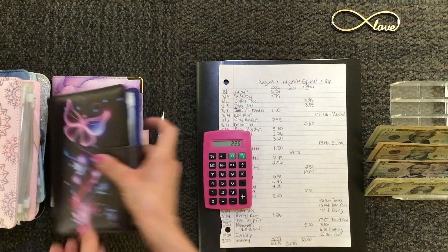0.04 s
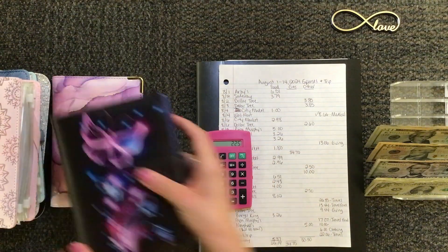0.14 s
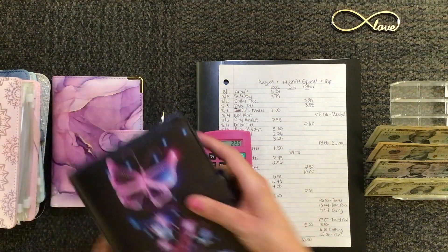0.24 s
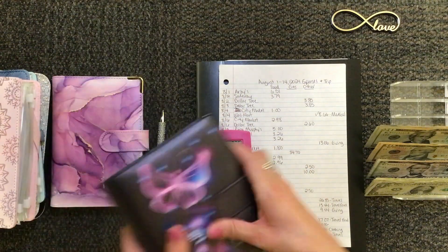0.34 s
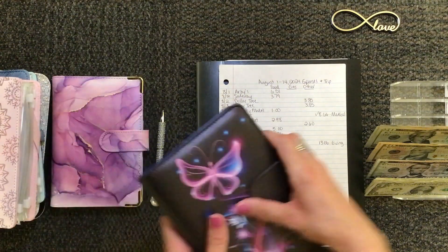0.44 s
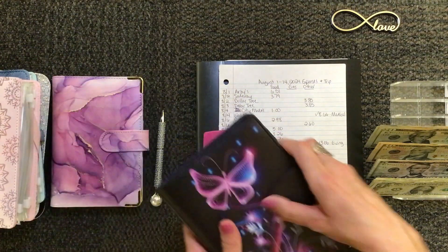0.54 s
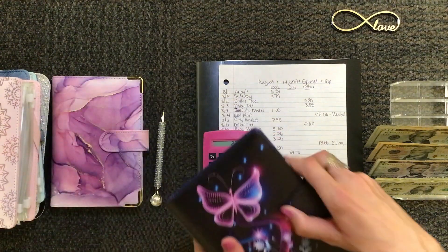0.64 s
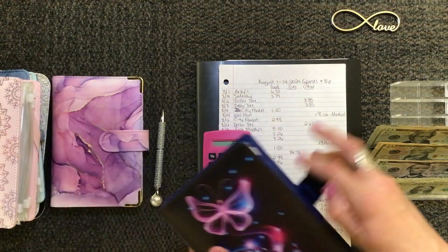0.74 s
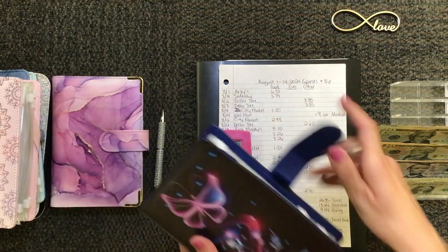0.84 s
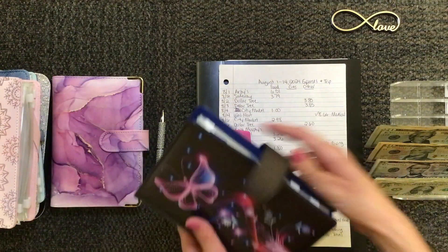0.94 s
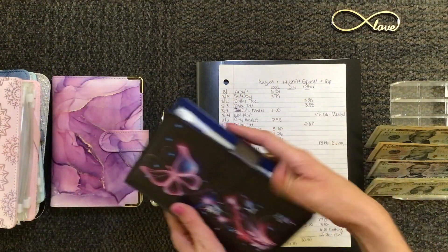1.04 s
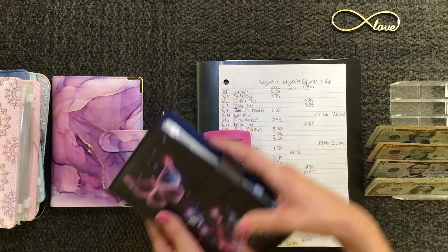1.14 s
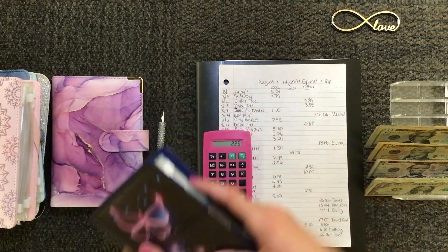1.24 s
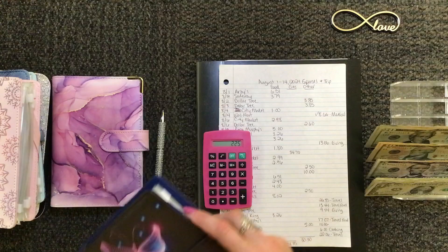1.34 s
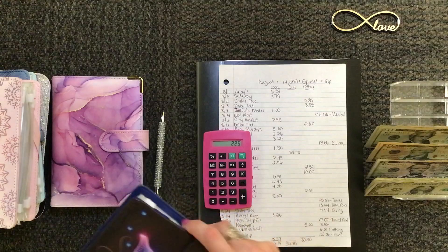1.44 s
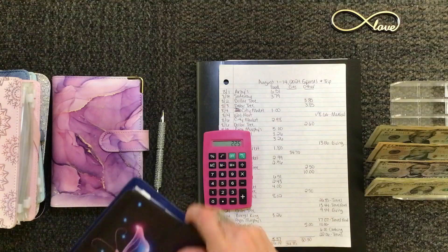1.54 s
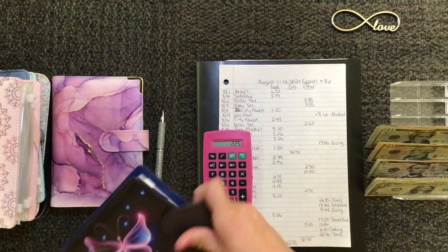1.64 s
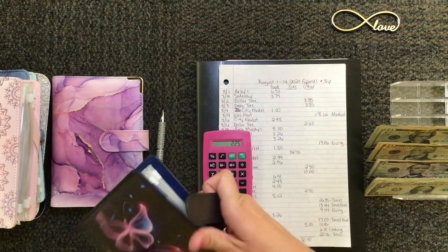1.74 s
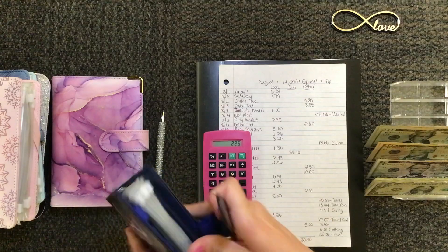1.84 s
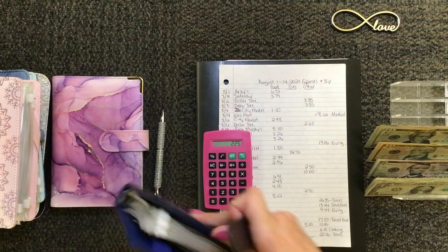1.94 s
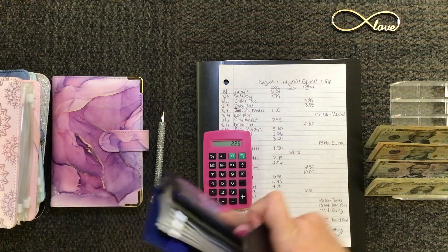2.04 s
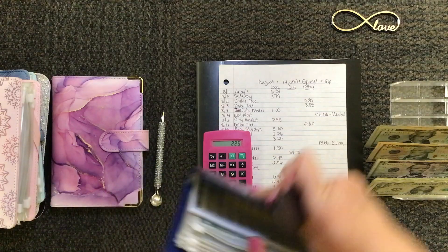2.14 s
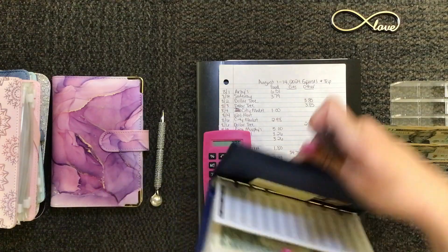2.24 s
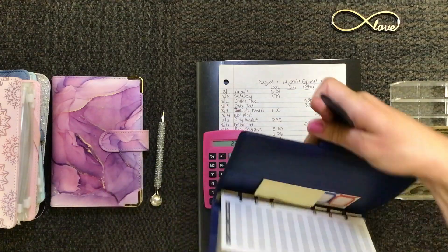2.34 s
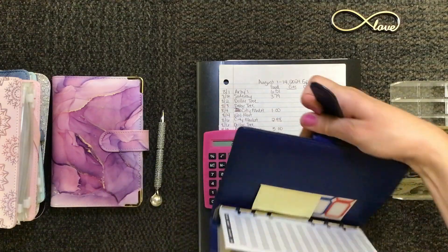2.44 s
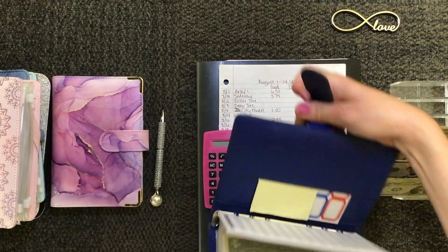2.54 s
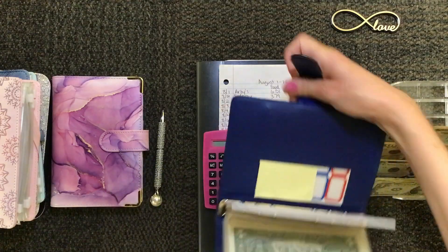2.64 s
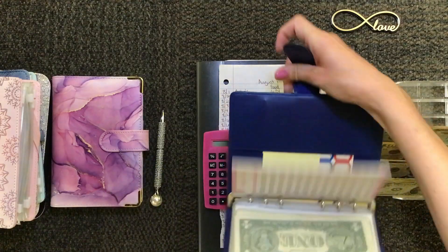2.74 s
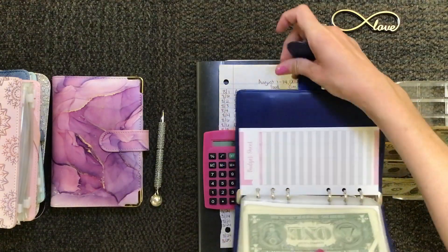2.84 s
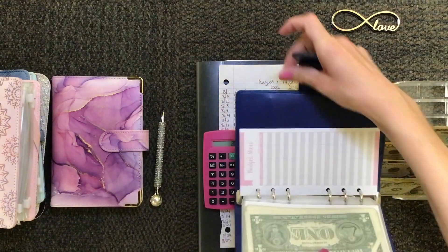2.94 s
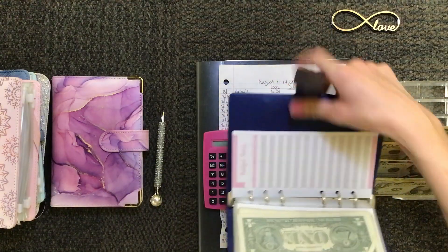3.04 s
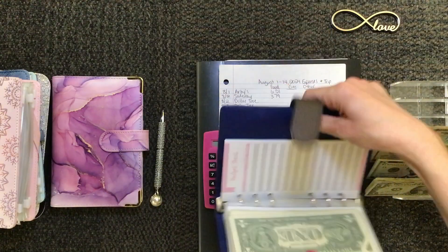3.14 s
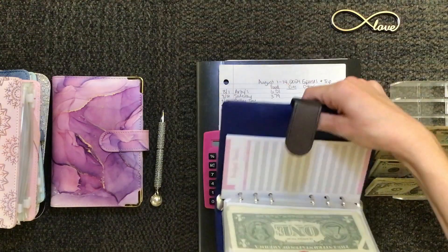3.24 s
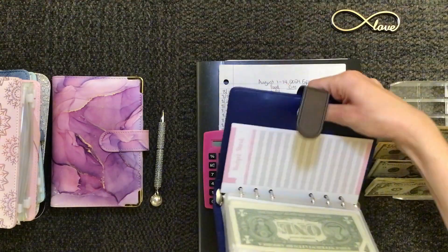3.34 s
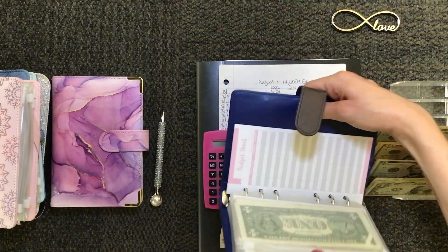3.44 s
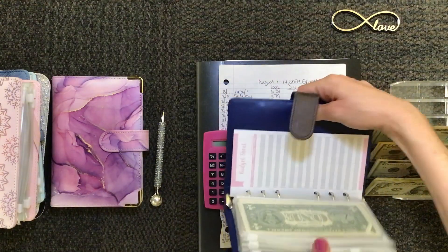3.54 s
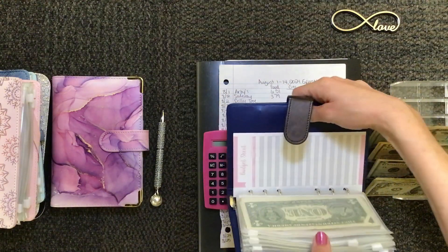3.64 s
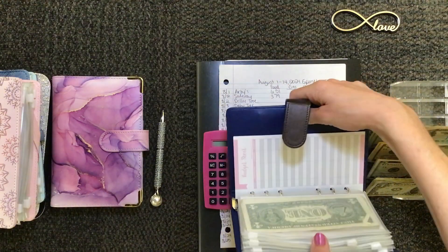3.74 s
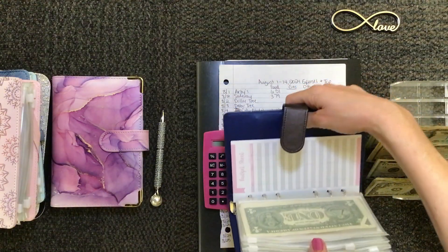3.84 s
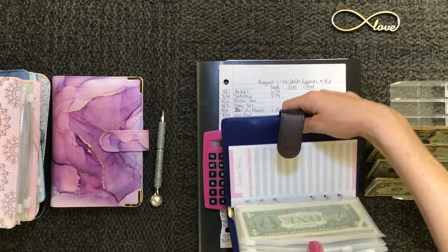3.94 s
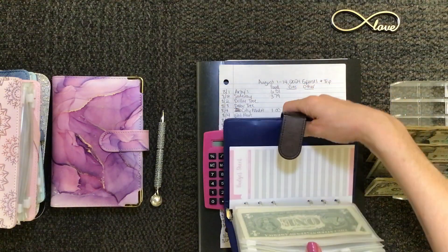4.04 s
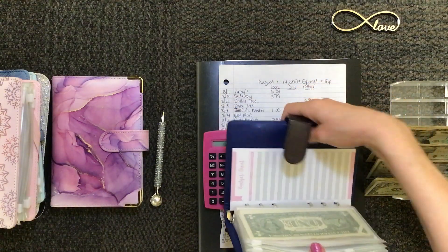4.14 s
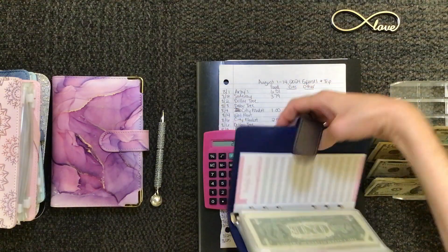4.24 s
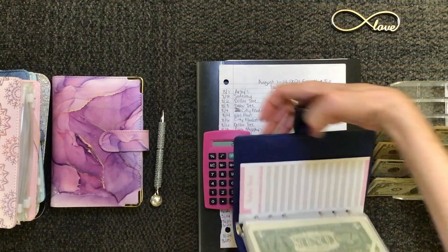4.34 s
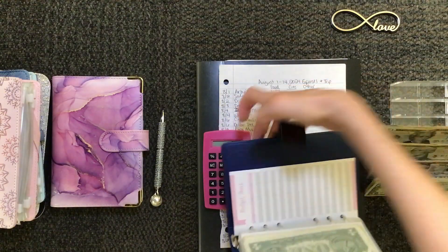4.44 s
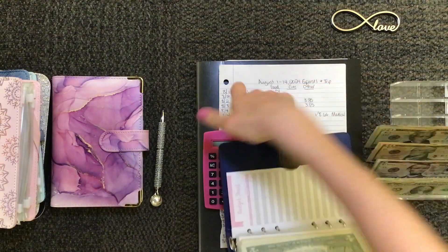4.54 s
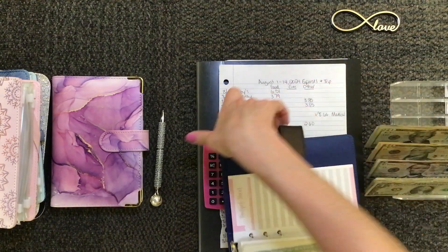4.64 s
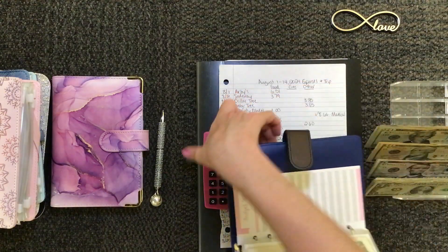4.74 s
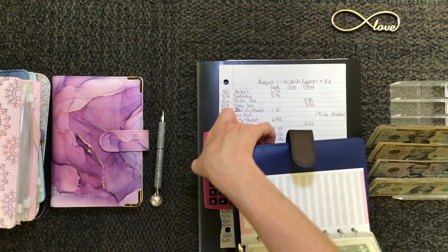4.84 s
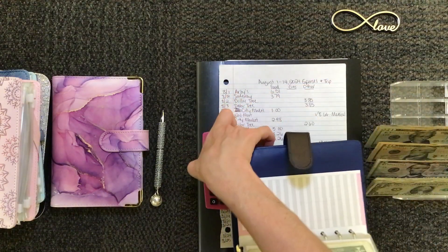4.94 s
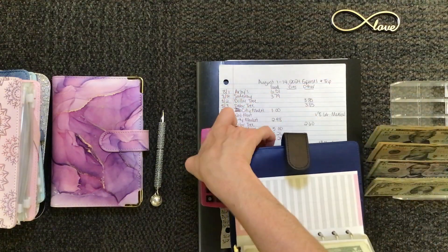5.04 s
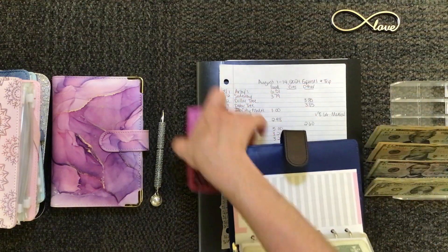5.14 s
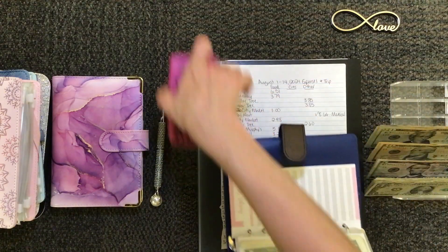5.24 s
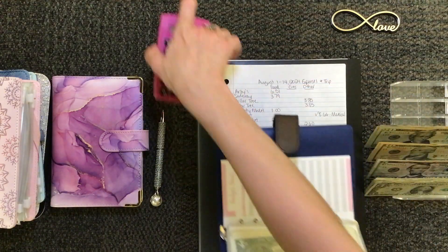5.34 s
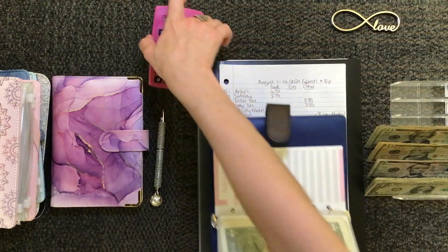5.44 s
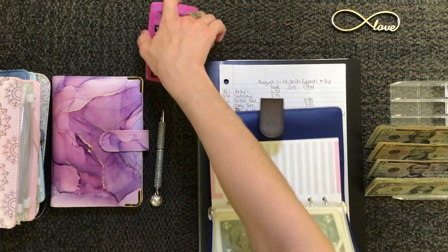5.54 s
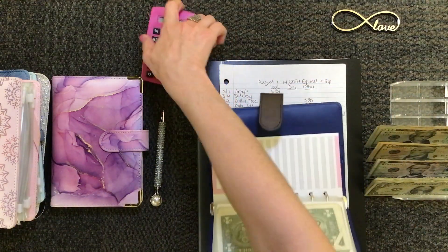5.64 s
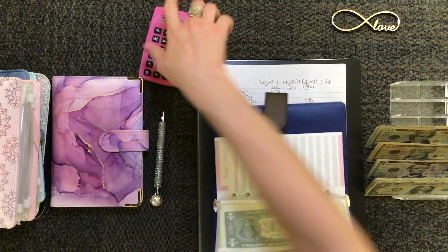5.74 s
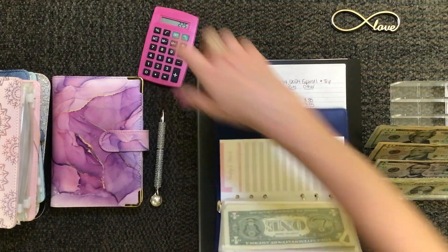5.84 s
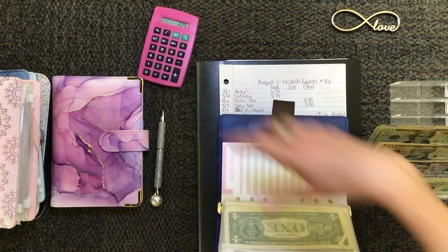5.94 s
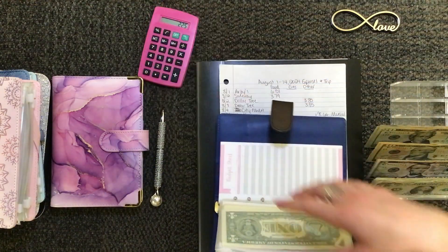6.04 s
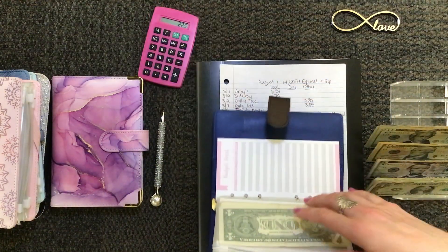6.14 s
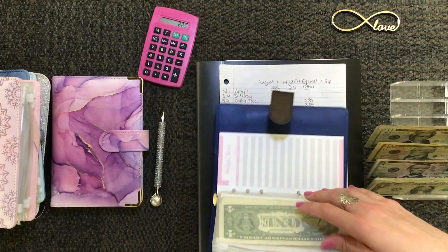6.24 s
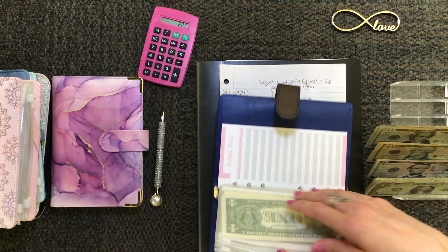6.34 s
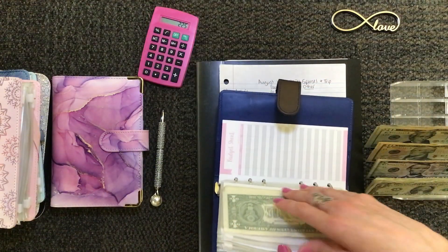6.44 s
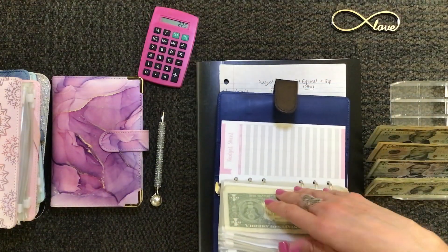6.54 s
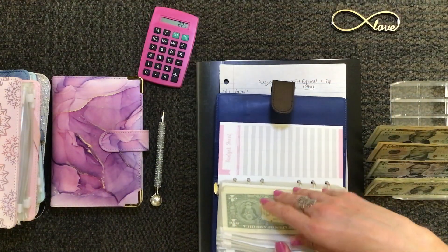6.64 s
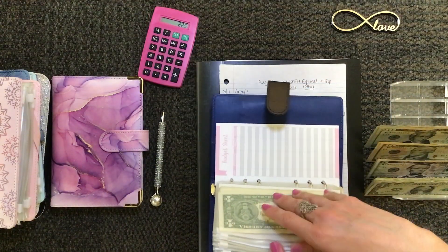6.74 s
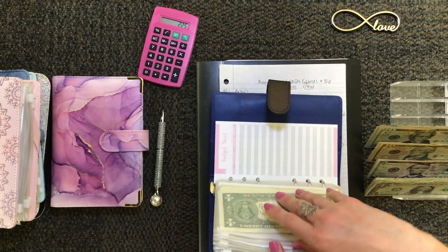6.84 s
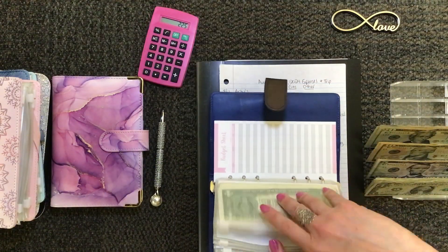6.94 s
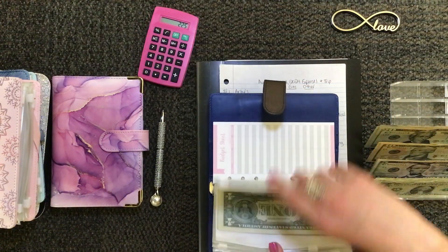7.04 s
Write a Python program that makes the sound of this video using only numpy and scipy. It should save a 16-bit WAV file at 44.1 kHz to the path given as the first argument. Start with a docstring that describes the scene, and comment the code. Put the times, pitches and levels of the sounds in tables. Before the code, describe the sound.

A small room's low rumble and faint hiss run throughout, with everything handled close to the microphone. A brief rub opens, then at 0.3 s a brisker slide with a soft, low bump, and more rubbing and dragging over cloth until 0.9. At 1.02 s a clasp pops extremely hard, with a bright crack and short boom. Uneven, airy rubs follow at 1.35, 1.55 and 1.8 s, then gentler sliding with faint crinkles from 2.1. At 2.85 s a second hard snap is slightly duller. Sleeves flex with small papery ticks until about 4.2, with soft rubs to 4.4. Hollow finger taps come around 4.5-4.7 and 5.3-5.4. From 5.64 to 5.81 s a plastic calculator is set down in a rapid, ringing clatter. After a pause, fingers brush and tick over plastic sleeves at 6.2-6.7, with a last flick near 7.1.

```python
"""Soft rubs over low room rumble come first, then a bump and the hard pop of a cash binder's clasp.
The binder is handled close to the microphone at a cloth-covered table in a small room: filtered noise
makes hands slide and cloth drag, damped resonances make the clasp and the cover snap as it knocks down.
A plastic calculator, a sum of ringing case modes, is set aside with a chatter of touches.
Fingers brush and tick over the plastic sleeves of banknotes: short resonant flips with crackle."""
import sys
import numpy as np
from scipy import signal
from scipy.fft import rfft, irfft, next_fast_len
from scipy.io import wavfile

SR = 44100
rng = np.random.default_rng(int(sys.argv[2]) if len(sys.argv) > 2 else 0)


def wav_out(sig):
    """Save sig, one row per channel (or a flat mono array), as 16-bit PCM at SR to the path in sys.argv[1]."""
    wavfile.write(sys.argv[1], SR, np.round(np.clip(np.atleast_2d(sig).T, -1, 1) * 32767).astype(np.int16))


N = 312669
TIME = np.arange(N) / SR
AGE = TIME[:SR // 2]  # time since a contact, up to half a second


def from_db(db):
    """Decibels to gain."""
    return 10 ** (np.asarray(db) / 20)


def rms_one(x):
    """Scale to unit power."""
    return x / np.sqrt(np.mean(x ** 2) + 1e-20)


def at_hz(points, hz):
    """Read a table along a log-frequency axis."""
    f, value = np.transpose(points)
    return np.interp(np.log(hz + 1e-9), np.log(f), value)


def tint(x, spectrum):
    """Give a noise its colour; unit power."""
    size = next_fast_len(len(x))
    gain = from_db(at_hz(spectrum, np.fft.rfftfreq(size, 1 / SR)))
    coloured = irfft(rfft(x, size) * gain, size)
    return rms_one(coloured[:len(x)])


def band(x, low_hz, high_hz, order=2):
    """Causal band-pass."""
    limits = [max(low_hz, 10), min(high_hz, 0.49 * SR)]
    sos = signal.butter(order, limits, "band", fs=SR, output="sos")
    return signal.sosfilt(sos, x + 1e-18)


def fade(t60):
    """Free decay of a struck thing: 60 dB down after t60 seconds."""
    return from_db(-60 * AGE / t60)


def pop(hz, width_hz, order=2):
    """A click through a heavily damped resonance: a few cycles, peak 1."""
    low = np.hypot(hz, width_hz / 2) - width_hz / 2
    wave = band(1.0 * (AGE == 0), low, low + width_hz, order=order)
    return wave / np.abs(wave).max()


def burst(low_hz, high_hz, t60):
    """A dying puff of noise."""
    noise = band(rng.standard_normal(len(AGE)), low_hz, high_hz)
    return rms_one(noise) * fade(t60)


def drift(rate):
    """Random wander: straight lines between random knots of spread 1, rate knots per second."""
    knots = rng.standard_normal(N // 20)
    return np.interp(TIME * rate, np.arange(len(knots)), knots)


def add(track, s, sound):
    """Lay a sound into a track at time s."""
    start = int(round(s * SR))
    track[start:start + len(sound)] += sound[:max(N - start, 0)]


def snaps():
    """Clasp and cover give a short, hard pulse with a crack on top; binder and table boom after it."""
    # hard snaps: (t/s, level/dB, ring f/Hz, width/Hz, upper ring/dB, crack/dB, top of the boom f/Hz)
    snap_table = [(1.0234, 1, 1280, 690, 1.5, -19, 4200), (2.8518, 1.5, 1427, 705, -38, -17.5, 1630)]
    # boom of binder and table: (f/Hz, level per Hz/dB)
    boom_colour = [(60, -25), (150, -17), (300, 8.5), (500, 1.5), (800, 1.5), (1250, -3), (2200, -4),
                   (4500, -11)]
    out = np.zeros(N)
    for s, db, hz, width_hz, upper_db, crack_db, top_hz in snap_table:
        pulse = pop(hz, width_hz) - from_db(upper_db) * pop(2935, width_hz=3200, order=4)
        crack = from_db(crack_db) * burst(1800, 18150, t60=0.0047)
        rumble = tint(rng.standard_normal(len(AGE)), boom_colour)
        boom = band(rumble, 20, top_hz, order=4) * fade(0.37)
        add(out, s, from_db(db) * (pulse + crack + from_db(-24.0) * boom))
    return out


def bumps():
    """The padded binder meets the table softly: one low, uneven note that swells in, then dies."""
    # binder bumps on the table or is jolted by its clasp: (t/s, level before a 7 dB cut/dB, f/Hz, t60/s)
    bump_table = [(0.295, -25, 213, 0.33), (0.479, -25.5, 248, 0.18), (0.481, -31, 113, 0.22),
                  (1.027, -16.5, 294.5, 0.13), (1.027, -22.5, 520, .18), (1.03, -33.5, 113, 0.22),
                  (2.855, -35.5, 329, 0.11)]
    out = np.zeros(N)
    for s, db, hz, t60 in bump_table:
        tone = np.sin(2 * np.pi * hz * AGE) * fade(t60)
        note = tone + from_db(-4.5) * burst(0.65 * hz, 2.0 * hz, t60)
        soft_onset = 1 - fade(0.023)
        add(out, s, from_db(db - 7.0) * note * soft_onset)
    return out


def sliding():
    """Pressed strokes rub in the middle range, light fast ones hiss; the cloth answers dully."""
    # a hand or sleeve slides: (fastest t/s, speeding up/s, slowing down/s, rub level/dB, hiss level/dB)
    stroke_table = [(0.025, 0.03, 0.033, -47.5, -52), (0.31, 0.019, 0.1, -36, -36.5),
                    (0.48, .05, 0.2, -46, -60), (0.579, 0.017, 0.019, -37.5, -40),
                    (0.70, 0.072, .22, -49, -54), (0.82, 0.021, .04, -73, -44),
                    (1.024, 0.03, 0.049, -39, -42.5), (1.35, 0.15, 0.11, -44.5, -42.5),
                    (1.558, 0.03, 0.046, -40.5, -44), (1.81, 0.11, .13, -42.5, -34),
                    (2.02, 0.05, 0.029, -44, -55.5), (2.13, .02, 0.24, -46.5, -51),
                    (2.27, 0.19, 0.1, -48, -52), (2.55, 0.027, 0.1, -50, -48),
                    (2.68, .06, 0.11, -49, -51.5), (3.18, 0.085, 0.085, -51.5, -63),
                    (4.06, .02, 0.047, -50, -65), (4.175, 0.012, 0.11, -44.5, -61),
                    (4.26, 0.065, 0.05, -50, -47), (4.38, 0.071, .05, -53, -49),
                    (6.195, 0.023, 0.053, -43.5, -53), (6.33, 0.078, 0.056, -66, -45),
                    (6.612, 0.0057, 0.016, -43, -50), (6.695, .012, .018, -43.5, -44.5),
                    (7.06, 0.09, 0.074, -54.5, -65)]
    # the binder is shoved over the tablecloth: (fastest t/s, speeding up/s, slowing down/s, level/dB)
    shove_table = [(0.02, 0.032, 0.066, -52), (0.315, 0.018, 0.052, -40.5), (0.62, 0.17, 0.48, -47),
                   (2.3, 0.15, 0.097, -50.5), (2.53, 0.024, 0.088, -46.5), (3.15, 0.15, .13, -49),
                   (6.25, 0.1, 0.1, -49.5)]
    # colours of pressed rub, light hiss and dragged cloth: (f/Hz, level per Hz/dB)
    rub_colour = [(150, -30), (300, -9), (700, -4.5), (1200, -4.5), (2000, 3), (3000, -4), (4500, -3),
                  (6500, -13.5), (15000, -20)]
    hiss_colour = [(800, -8.5), (2000, -1.5), (5000, -1), (7000, -6.5), (9300, 0.5), (11500, -4),
                   (14000, -2), (16000, -3)]
    cloth_colour = [(100, -11.5), (280, 5.5), (500, 2), (1300, -3.5), (2200, -8.5), (5000, -26.5)]
    # overlapping movements add in power
    rub_power, hiss_power, drag_power = np.zeros((3, N))
    for top_s, rise_s, fall_s, rub_db, hiss_db in stroke_table:
        speed = swell(top_s, rise_s, fall_s)
        rub_power += (from_db(rub_db) * speed) ** 2
        hiss_power += (from_db(hiss_db) * speed) ** 2
    for top_s, rise_s, fall_s, db in shove_table:
        drag_power += (from_db(db) * swell(top_s, rise_s, fall_s)) ** 2
    rub_grain = friction(rub_colour, slips_per_s=240, slip_share=0.43, flutter_db=2.0, patchy_db=6.0)
    hiss_grain = friction(hiss_colour, slips_per_s=427, slip_share=0.17, flutter_db=2.0, patchy_db=5.0)
    cloth_grain = tint(rng.standard_normal(N), cloth_colour)
    rub = np.sqrt(rub_power) * rub_grain
    hiss = np.sqrt(hiss_power) * hiss_grain
    drag = np.sqrt(drag_power) * cloth_grain
    return rub + hiss + drag


def swell(top_s, rise_s, fall_s):
    """Gain of one sliding movement: it gathers speed, passes its fastest moment and slows to rest."""
    # the gain is edge_db below its top after each of the two times; the power rounds the top
    edge_db, rounding = 10, 1.44
    away = np.maximum((top_s - TIME) / rise_s, (TIME - top_s) / fall_s)
    gain, moving = np.zeros(N), away < 4
    gain[moving] = from_db(-edge_db * away[moving] ** rounding)
    return gain


def friction(spectrum, slips_per_s, slip_share, flutter_db, patchy_db):
    """Tiny slips hiss, coarser catches come in clumps, and the colour shifts as the contact moves."""
    chance = slips_per_s * from_db(5 * drift(40)) / SR  # the catch rate wanders, so catches clump
    catches = (rng.random(N) < chance) * rng.standard_normal(N)
    grain = rng.standard_normal(N) + slip_share * rms_one(catches)
    edges = np.geomspace(150, 20000, 15)
    patches = np.zeros(N)
    for low, high in zip(edges, edges[1:]):  # each band wanders in level by itself
        patches += band(grain, low, high, order=1) * from_db(patchy_db * drift(25))
    return tint(patches, spectrum) * from_db(flutter_db * drift(70))


def ticks():
    """Clear single ticks of creases and fingertips, and faint ones at random while the sleeves flex."""
    # clearest ticks on sleeves and cover: (t/s, level/dB, ring f/Hz, treble before a 5.5 dB cut/dB)
    tick_table = [(0.2937, -16, 1220, -20), (1.3372, -27.5, 3770, 3.5), (1.35, -34, 1997, 9.5),
                  (2.2916, -26, 2070, -7), (2.504, -25.5, 1040, -15), (2.5243, -29, 3000, -18),
                  (2.7921, -25.5, 2100, -33), (3.127, -28, 1730, -24.5), (3.1577, -26.5, 1110, -25),
                  (3.1898, -34, 2180, -2), (3.2219, -39.5, 2150, 6.5), (3.393, -36, 1860, -15),
                  (3.6716, -31.5, 2700, -26), (3.813, -35, 1930, -27), (4.693, -40, 1850, 6),
                  (4.0441, -26.5, 1900, -33), (4.1583, -34, 1560, -23), (4.8811, -28, 1310, -28),
                  (6.1769, -21.5, 1430, -38), (6.2422, -27.5, 2040, -10), (6.2481, -25.5, 1980, -5.5),
                  (6.4792, -32, 1650, -7.5), (6.6053, -24.5, 2460, -14), (7.0828, -22.5, 1630, -36)]
    # the sleeves flex and crinkle faintly: (from t/s, to t/s, crinkles per s, lowest level/dB)
    flex_table = [(2.099, 3.304, 22, -41), (3.399, 4.1, 14, -40.5), (6.191, 6.398, 25, -38.5)]
    out = np.zeros(N)
    for s, db, hz, treble_db in tick_table:
        add(out, s, from_db(db) * crease(hz, treble_db))
    for start, end, per_s, lowest_db in flex_table:
        count = int(abs(end - start) * per_s)
        for when, size, pitch in rng.random((count, 3)):
            crinkle = crease(1500 * 2 ** pitch, treble_db=-19.5)
            add(out, start + when * (end - start), from_db(lowest_db + 10 * size) * crinkle)
    return out


def crease(hz, treble_db):
    """A crease flips: the sheet rings for a cycle or two and its surface crackles."""
    flip = pop(hz, width_hz=1300, order=1)
    sheet = from_db(-1.5) * flip + from_db(-12) * burst(0.65 * hz, 1.14 * hz, t60=0.042)
    crackle = from_db(-9.5) * burst(760, 3200, t60=0.023)
    treble = from_db(treble_db - 5.5) * burst(4680, 19000, t60=0.02)
    return sheet + crackle + treble


def calculator():
    """Each touch clicks, rings the case anew, shakes the loose keys and thuds on the table."""
    # an edge or foot touches down and chatters: (t/s, level/dB, loss per bounce/dB)
    touch_table = [(5.638, -34.5, 5), (5.653, -25, 3.5), (5.663, -19.5, 9), (5.676, -11, 2.5),
                   (5.688, -14, 4.5), (5.725, -29, 6), (5.738, -24, 5), (5.762, -14, 19), (5.809, -24.5, 4)]
    # case modes: (f/Hz, level before random scatter and a 3.5 dB cut/dB)
    case_modes = [(590, -21), (721, -17), (1195, -8), (1283, -10), (1530, -2), (1975, -0.5), (2200, -11)]
    cycles = 42  # every mode dies by 60 dB in this many cycles
    out = np.zeros(N)
    for s, db in bounces(touch_table, count=3):
        case = np.zeros(len(AGE))
        for hz, level in case_modes:
            gain = from_db(level + rng.normal(0, 1.2))
            case += gain * np.sin(2 * np.pi * (hz * AGE + rng.random())) * fade(cycles / hz)
        ring = from_db(-3.5) * case * (1 - fade(0.0023))
        click = from_db(-3.5) * pop(1750, width_hz=810) + from_db(-7) * pop(5130, width_hz=540, order=1)
        thud = from_db(-21) * burst(244, 405, t60=0.045)
        keys = from_db(-6.5) * burst(540, 2130, t60=0.041)
        keys += from_db(-15.5) * burst(2300, 4900, t60=0.033)
        keys += from_db(-18) * burst(7700, 15500, t60=0.03)
        add(out, s, from_db(db) * (ring + click + keys + thud))
    return out


def bounces(touches, count):
    """Each touch and its quick, uneven rebounds, every one weaker than the last: (t/s, level/dB)."""
    spacing_s = 0.0048  # each rebound's delay is scattered by up to a fifth
    hits = []
    for s, db, loss_db in touches:
        for k in range(count):
            hits.append((s + k * spacing_s * rng.uniform(0.8, 1.2), db - k * loss_db))
    return hits


def taps():
    """Fingers on plastic: a small hollow knock with a faint scratch."""
    # finger knocks, mostly on the calculator and its keys: (t/s, level/dB, ring f/Hz)
    tap_table = [(3.7035, -34.5, 805), (4.5115, -33, 1960), (4.588, -27.5, 1070), (4.6854, -30, 1820),
                 (5.2957, -28.5, 1880), (5.3279, -31.5, 1930), (5.335, -34, 1880), (5.380, -24.5, 1380)]
    out = np.zeros(N)
    for s, db, hz in tap_table:
        knock = pop(hz, width_hz=250, order=1) + from_db(-17) * burst(0.85 * hz, 1.15 * hz, t60=0.05)
        scratch = from_db(-23.5) * burst(980, 2300, t60=0.029)
        add(out, s, from_db(db) * (knock + scratch))
    return out


def room(x, wet_db):
    """Dense wall echoes that build up briefly and then die at a rate set by frequency."""
    # colour of the room's answer: (f/Hz, relative level/dB)
    echo_colour = [(100, 3.5), (400, -1.5), (1200, -4.5), (2200, -10.5), (4500, -4), (7000, -6),
                   (15000, -7.5)]
    # decay of the room: (f/Hz, t60/s)
    echo_t60 = [(150, 0.84), (500, 0.28), (1500, 0.338), (5000, 0.34), (14000, 0.17)]
    white = rng.standard_normal((2, len(AGE)))
    tail = np.zeros(len(AGE))
    edges = np.geomspace(70, 18000, 9)
    for k, (low, high) in enumerate(zip(edges, edges[1:])):
        hz = np.sqrt(low * high)
        echo = band(white[k % 2], low, high) * fade(at_hz(echo_t60, hz))  # neighbours use separate noises
        tail += echo * from_db(at_hz(echo_colour, hz))
    tail = tail * (1 - fade(0.0058))  # build-up
    unit_tail = tail / np.sqrt(np.sum(tail ** 2))
    return from_db(wet_db) * signal.fftconvolve(x, unit_tail)[:N]


def room_air():
    """The steady rumble and hiss behind everything: coloured noise."""
    # background colour: (f/Hz, level per Hz/dB)
    air_colour = [(25, -23.5), (59, 4), (123, 1), (277, -2), (400, -5.5), (1000, -13), (2200, -17.5),
                  (8000, -24.5), (14000, -27), (16000, -65)]
    return from_db(-51.5) * tint(rng.standard_normal(N), air_colour)


def scene():
    """Handling sounds close to the microphone, their echoes, and the room's steady rumble and hiss."""
    knocks = snaps() + bumps()
    touches = ticks() + taps()
    clatter = calculator()
    echoes = room(knocks, wet_db=-15.0) + room(touches, wet_db=-7) + room(clatter, wet_db=-6)
    return (knocks + touches + clatter + sliding() + echoes + room_air())[None]


def record(dry):
    """The hardest snaps overload at full scale; the deepest bass and the top are cut."""
    overloaded = np.clip(dry, -1, 1)
    bass_cut = signal.butter(4, 50, "high", fs=SR, output="sos")
    top_cut = signal.ellip(10, 0.2, 80, 16000, fs=SR, output="sos")  # ripple dB, stop-band dB, edge Hz
    return signal.sosfilt(top_cut, signal.sosfilt(bass_cut, overloaded))


dry = scene()
out = record(dry)
wav_out(out)
```